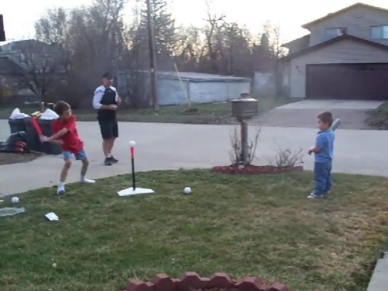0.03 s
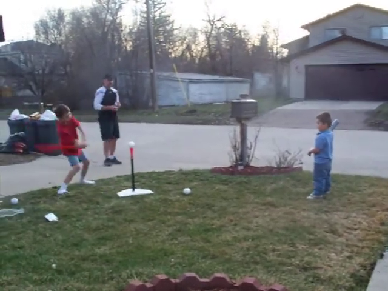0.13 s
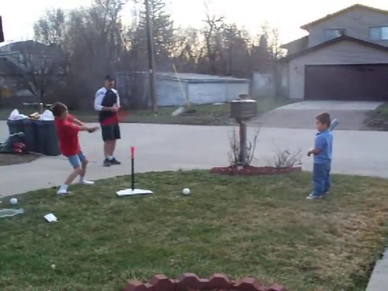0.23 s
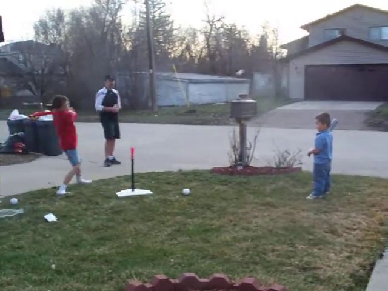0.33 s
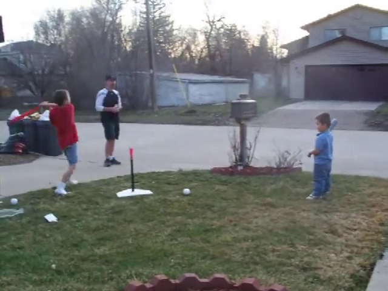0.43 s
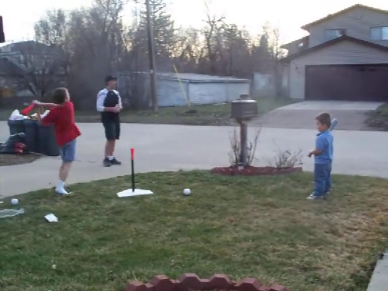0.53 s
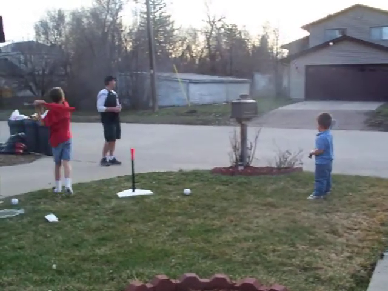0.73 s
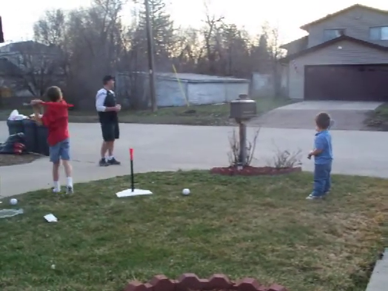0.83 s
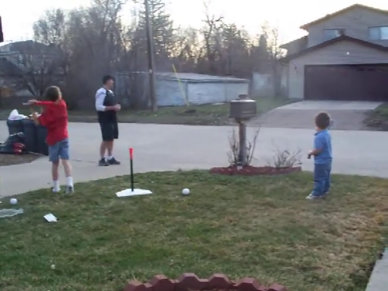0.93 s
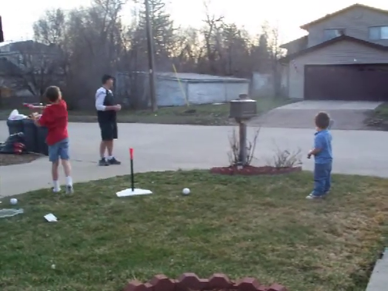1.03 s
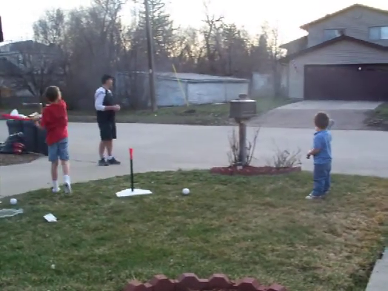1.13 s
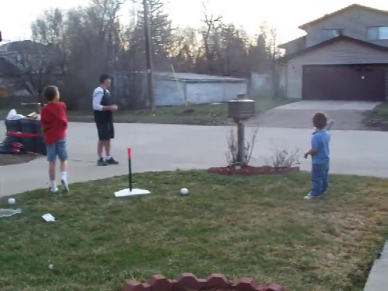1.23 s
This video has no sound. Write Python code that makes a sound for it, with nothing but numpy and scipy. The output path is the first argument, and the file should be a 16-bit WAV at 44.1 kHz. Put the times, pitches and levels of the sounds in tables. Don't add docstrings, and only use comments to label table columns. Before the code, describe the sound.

Sharp hollow crack of a toy bat hitting a ball outdoors, with short echoes off nearby houses

```python
import sys
import numpy as np
from scipy import signal
from scipy.fft import rfft, irfft
from scipy.io import wavfile

SR = 44100
rng = np.random.default_rng(int(sys.argv[2]) if len(sys.argv) > 2 else 0)


def output_pcm(signal):
    pcm = np.clip(np.atleast_2d(signal).T, -1, 1) * 32767
    wavfile.write(sys.argv[1], SR, np.round(pcm).astype(np.int16))


def voltage_ratio(decibels):
    exponent = np.asarray(decibels, float) / 20
    return 10 ** exponent


N = 57330
HIT_S = 0.2451
RADIATE_ABOVE_HZ = 107


def rms_one(x):
    return x / np.sqrt(np.mean(x ** 2) + 1e-20)


def clock():
    return np.arange(N) / SR


def at_hz(points, hz):
    table = np.array(points)
    return np.interp(np.log(hz), np.log(table[:, 0]), table[:, 1])


def at_time(points):
    return np.interp(clock(), *np.transpose(points))


def drift(rate):
    step = 40
    r = np.exp(-2 * np.pi * step * rate / SR)
    noise = rng.standard_normal(N // step + 2002)
    slow = signal.lfilter([1], [1, -2 * r, r * r], noise)[2000:]
    return np.interp(np.arange(N) / step, np.arange(len(slow)), rms_one(slow))


def ring(x, hz, t60):
    r = voltage_ratio(-60 / (t60 * SR))
    w = 2 * np.pi * hz / SR
    return signal.lfilter([0, np.sin(w)], [1, -2 * r * np.cos(w), r * r], x + 1e-18)


def tone(hz):
    return np.sin(2 * np.pi * np.cumsum(hz) / SR)


def dull(x, hz):
    return signal.sosfilt(signal.butter(2, min(hz, .45 * SR), fs=SR, output="sos"), x)


def thin(x, hz):
    return signal.sosfilt(signal.butter(2, hz, "high", fs=SR, output="sos"), x)


def colour(x, spectrum):
    hz = np.maximum(np.fft.rfftfreq(N, 1 / SR), 1)
    inside = (hz > spectrum[0][0] / 2) & (hz < spectrum[-1][0] * 1.1)
    return rms_one(irfft(rfft(x) * voltage_ratio(at_hz(spectrum, hz)) * inside, N))


def bands(spectrum, gain):
    spec = rfft(colour(rng.standard_normal(N), spectrum))
    hz = np.fft.rfftfreq(N, 1 / SR)
    edges = 14 * 2 ** np.arange(0, 9.7, 1 / 3)
    out = np.zeros(N)
    for low, high in zip(edges, edges[1:]):
        band = irfft(spec * ((hz >= low) & (hz < high)), N)
        out += gain(np.sqrt(low * high)) * band
    return out


def swell(start, length, rise):
    t = clock() - start
    fall = np.clip((t - rise) / (length - rise), 0, 1)
    return np.clip(t / rise, 0, 1) * np.cos(np.pi / 2 * fall) ** 2


# (frequency [Hz], level [dB])
STREET = [(53, -24), (90, -5.5), (151, -5), (243, -12), (531, -18.5), (941, -15), (2490, -32), (7110, -37),
          (8610, -47), (11200, -85), (18900, -120)]
# (time [s], level [dB])
HUM = [(0, 14), (0.061, -6), (.45, 2), (.65, 4), (.75, -5.5), (1.1, -5.5), (1.2, 6), (1.3, -30)]
STREET_DB, TYRE_DB, HUM_DB, WHINE_DB = -52.5, -64.5, -54, -75.5
TYRE_HZ, TYRE_T60_S = 886, 0.012
HUM_HZ, HUM_WIDTH_HZ, WHINE_HZ = 146.4, 3.37, 4280


def street():
    shared = drift(3.8)
    hiss = bands(STREET, lambda hz: voltage_ratio(.4 * shared + .9 * drift(12)))
    tyres = ring(rng.standard_normal(N), TYRE_HZ, TYRE_T60_S)
    tyres = rms_one(ring(tyres, TYRE_HZ, TYRE_T60_S)) * voltage_ratio(3.2 * drift(16))
    hum = tone(HUM_HZ + HUM_WIDTH_HZ * drift(13)) * voltage_ratio(at_time(HUM))
    whine = np.sin(2 * np.pi * WHINE_HZ * clock()) * voltage_ratio(1.5 * drift(25))
    return voltage_ratio(STREET_DB) * hiss + voltage_ratio(TYRE_DB) * tyres + voltage_ratio(HUM_DB) * hum + voltage_ratio(WHINE_DB) * whine


# (frequency [Hz], level [dB])
WIND = [(8.8, -49), (15, 2), (64, 5.5), (108, -4), (144, -10.5), (200, -32), (260, -68), (440, -120)]
# (time [s], level [dB])
GUST = [(0, 0), (.15, 11.5), (.3, 6.5), (.5, -0.5), (.8, 7), (1.0, 5), (1.3, 5.5)]
WIND_DB = -55


def wind():
    strength_db = WIND_DB + at_time(GUST) + 0.95 * drift(9.7)
    return voltage_ratio(strength_db) * colour(rng.standard_normal(N), WIND)


# (time [s], length [s], level [dB])
SCUFFS = [
    (.1448, .012, -45),
    (.151, .02, -52),
    (.158, .017, -45),
    (.690, .05, -58),
    (1.218, .022, -59),
]
# (frequency [Hz], level [dB])
SCUFF = [(900, -9.5), (1500, 8), (2600, -5), (4100, -4.5), (6200, -6.5), (7500, -14.5), (8500, -25)]
# (time [s], length [s], level [dB])
SQUEAKS = [
    (.1455, .010, -56),
    (.1505, .025, -55),
    (.1585, .015, -56),
    (.697, .012, -60),
    (.705, .012, -61),
    (.718, .01, -65),
]
SQUEAK_HZ = [4000, 1300, 6100, 4150, 4150, 4150]
GRIT_PER_S, SQUEAK_WOBBLE_HZ = 5000, 40
HEEL_DB, HEEL_HZ, HEEL_T60_S = -31, 1300, 0.011


def scuffs():
    hits = rng.random(N) < GRIT_PER_S / SR
    strength = voltage_ratio(2.0 * np.minimum(rng.exponential(1, N), 4))
    grit = hits * strength * rng.choice([-1, 1], N)
    out = colour(grit, SCUFF) * sum(voltage_ratio(db) * swell(s, length, 0.0016) for s, length, db in SCUFFS)
    for (s, length, db), hz in zip(SQUEAKS, SQUEAK_HZ):
        squeak = np.sqrt(2) * tone(hz + SQUEAK_WOBBLE_HZ * drift(150))
        out = out + voltage_ratio(db) * swell(s, length, 0.0017) * squeak
    heel = np.zeros(N)
    heel[int(SCUFFS[0][0] * SR)] = -voltage_ratio(HEEL_DB)
    return out + ring(heel, HEEL_HZ, HEEL_T60_S)


# (frequency [Hz], level [dB], time to fall 60 dB [s])
BAT = [(293, -12.5, 0.031), (370, -16, 0.03), (721, -6.5, 0.016), (877, 1, 0.012), (1028, -20, 0.059),
       (1505, -20, 0.059), (1705, -7.5, 0.011), (2160, -13.5, 0.017), (2984, -28, 0.033),
       (3540, -11.5, 0.009), (3947, -14, 0.009), (4910, -14.5, 0.0092), (5536, -11.5, 0.0098),
       (6495, -6, 0.0087)]
HIT_DB, CONTACT_HZ = -3.5, 5000
SNAP_DB, SNAP_T60_S, SNAP_ABOVE_HZ = -16, 0.012, 3570


def bat():
    t = clock() - HIT_S
    click = np.zeros(N)
    click[int(HIT_S * SR)] = -voltage_ratio(HIT_DB)
    contact = dull(click, CONTACT_HZ)
    modes = sum(voltage_ratio(db) * ring(contact, hz, t60) for hz, db, t60 in BAT)
    fade = voltage_ratio(SNAP_DB - 60 * np.maximum(t, 0) / SNAP_T60_S) * (t > 0)
    snap = fade * thin(rng.standard_normal(N), SNAP_ABOVE_HZ)
    return snap + thin(modes, RADIATE_ABOVE_HZ)


def ground(x):
    lag = int(0.001825 * SR)
    late = np.r_[np.zeros(lag), x[:N - lag]]
    return -voltage_ratio(-9) * dull(late, 5000)


# (delay [s], level [dB], thin below [Hz], dull above [Hz], smear [s])
ECHOES = [(.0075, -14, 201, 2500, 0.00036), (0.01, -31, 150, 500, 0.0026),
          (.0138, -10.5, 1510, 7000, 0.00052), (.0330, -16, 1220, 3450, 0.0044),
          (0.039, -23, 150, 478, 0.0036), (.0520, -29, 150, 453, .005), (0.1264, -21.5, 2920, 5000, .003),
          (.1270, -26, 1300, 2200, 0.0087), (.127, -23.5, 180, 424, 0.0078), (.155, -24, 150, 500, 0.018),
          (0.16, -32.5, 2500, 5000, .015), (0.182, -31.5, 151, 430, .012), (0.185, -34, 2500, 4500, 0.013)]
# (frequency [Hz], time to fall 60 dB [s])
SCATTER_T60 = [(100, 0.15), (300, 0.24), (800, 0.23), (2000, 0.16), (4000, 0.18), (8000, 0.13)]
# (frequency [Hz], level [dB])
SCATTER = [(80, 3), (300, -5.5), (700, -17), (1200, -13), (1800, -14.5), (2800, -22), (4800, -17.5),
           (8600, -29)]
SCATTER_DB = -26.5


def yard(x):
    out = np.zeros(N)
    for delay, db, low_hz, high_hz, smear in ECHOES:
        spray = np.exp(-np.arange(2000) / SR / smear) * rng.standard_normal(2000) * 0.34
        spray[0] = 1
        spray = spray / np.sqrt(np.sum(spray ** 2))
        lag = int(delay * SR)
        echo = signal.fftconvolve(x, spray)[:N - lag]
        echo = dull(dull(echo, high_hz), high_hz)
        out[lag:] += voltage_ratio(db) * thin(thin(echo, low_hz), low_hz)
    t = clock() - HIT_S
    tail = bands(SCATTER, lambda hz: voltage_ratio(-60 * np.maximum(t, 0) / at_hz(SCATTER_T60, hz)))
    return out + voltage_ratio(SCATTER_DB) * tail * np.clip(t / 0.0013, 0, 1)


# (frequency [Hz], level [dB], time to fall 60 dB [s])
TEE = [(239, -10, 0.034), (384, -9, 0.062), (560, -2, 0.018), (675, -30, 0.035)]
TEE_S, TEE_DB = 0.2770, -20.5


def tee():
    click = np.zeros(N)
    click[int(TEE_S * SR)] = -voltage_ratio(TEE_DB)
    knock = dull(click, 1400)
    return thin(sum(voltage_ratio(db) * ring(knock, hz, t60) for hz, db, t60 in TEE), RADIATE_ABOVE_HZ)


# (time [s], length [s], level [dB])
WHISTLES = [
    (0.72, 0.12, -67),
    (.83, 0.11, -75.5),
    (.95, 0.038, -77),
]
# (time [s], length [s], level [dB], top pitch [Hz], fall [Hz])
CHIRPS = [
    (1.180, .020, -64, 3530, 260),
    (1.207, .015, -64, 3490, 200),
    (1.2195, .011, -65, 3130, 300),
]
WHISTLE_HZ, WHISTLE_RISE_S = 2862, 0.0085


def birds():
    t = clock()
    whistle = tone(WHISTLE_HZ + 2.4 * drift(13)) * voltage_ratio(1.1 * drift(30))
    out = sum(voltage_ratio(db + 6) * swell(s, length, WHISTLE_RISE_S) * whistle for s, length, db in WHISTLES)
    for s, length, db, top_hz, fall_hz in CHIRPS:
        u = np.clip((t - s) / length, 0, 1)
        bend_hz = np.where(u < .4, 260, fall_hz)
        hz = top_hz - bend_hz * (np.abs(u - .4) / .5) ** 2
        out = out + voltage_ratio(db + 5) * np.sin(np.pi * u) ** 0.46 * tone(hz)
    return out


GAIN_BEFORE_DB, GAIN_FALL_S = 5.5, 0.11


def scene():
    crack = bat()
    since_hit = np.maximum(clock() - HIT_S, 0)
    gain = voltage_ratio(GAIN_BEFORE_DB * np.exp(-since_hit / GAIN_FALL_S))
    strike = crack + ground(crack) + yard(crack) + tee()
    around = gain * street() + wind() + scuffs() + birds()
    return (strike + around)[None]


def top_cut(x):
    return signal.sosfilt(signal.butter(12, 16500, fs=SR, output="sos"), x)


LIMIT_TOP, LIMIT_HARDNESS = 0.72, 4.9
CUTOFF_HZ, CLIP_TOP = 8720, 0.705


def record(dry):
    x = dry / (1 + np.abs(dry / LIMIT_TOP) ** LIMIT_HARDNESS) ** (1 / LIMIT_HARDNESS)
    x = signal.sosfilt(signal.cheby2(14, 70, CUTOFF_HZ * 1.078, fs=SR, output="sos"), x)
    mix = np.clip(x, -CLIP_TOP, CLIP_TOP)
    return top_cut(mix)


dry = scene()
out = record(dry)
output_pcm(out)
```